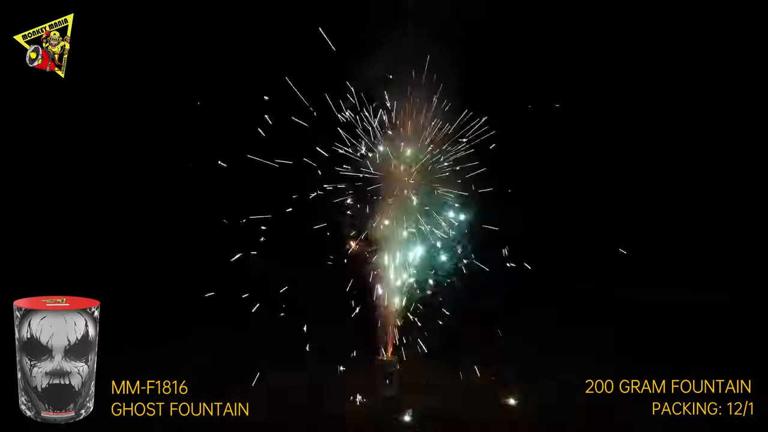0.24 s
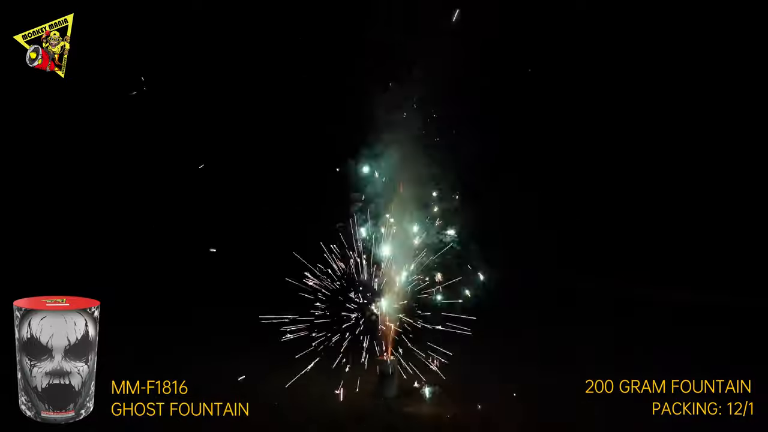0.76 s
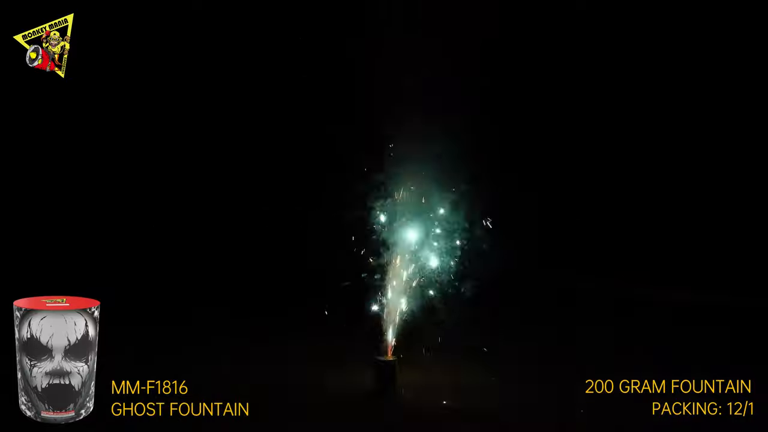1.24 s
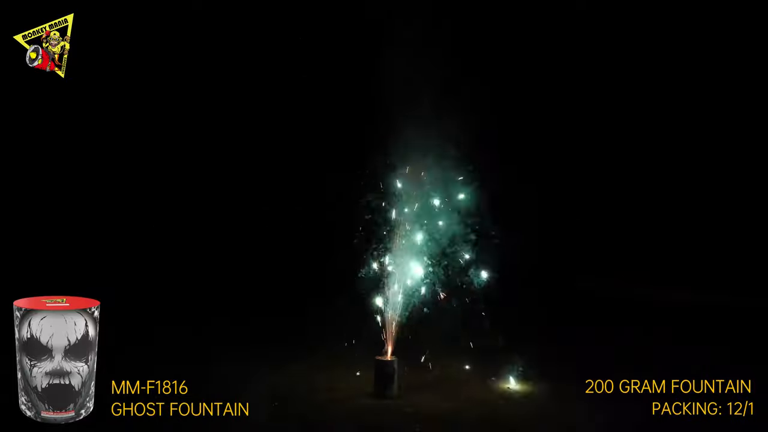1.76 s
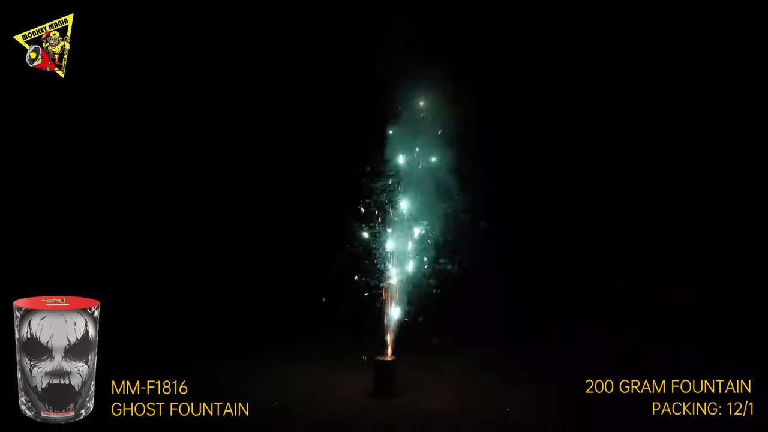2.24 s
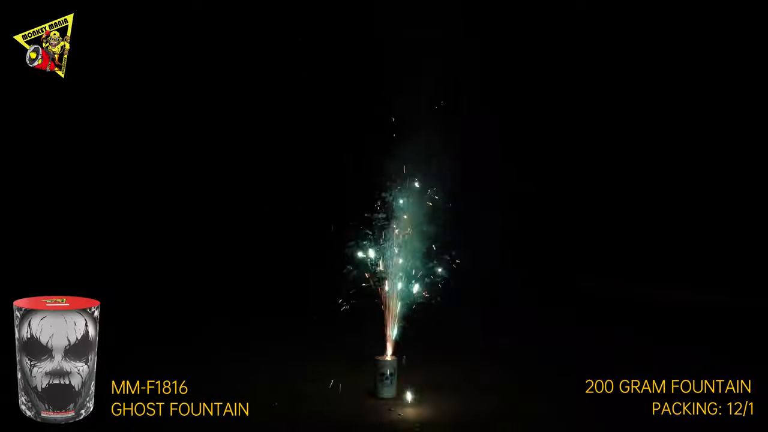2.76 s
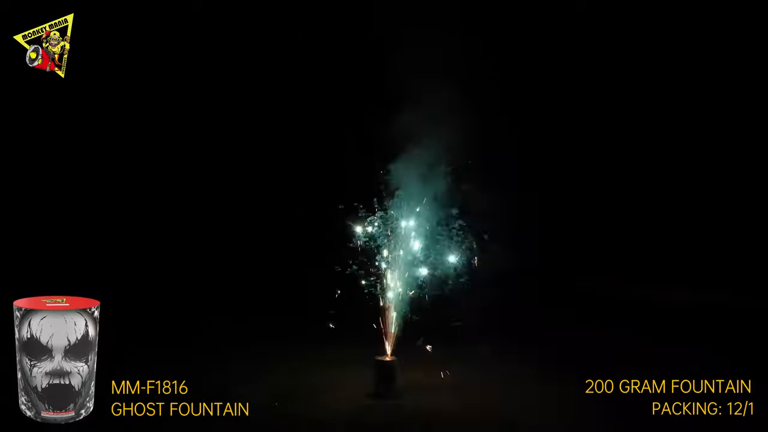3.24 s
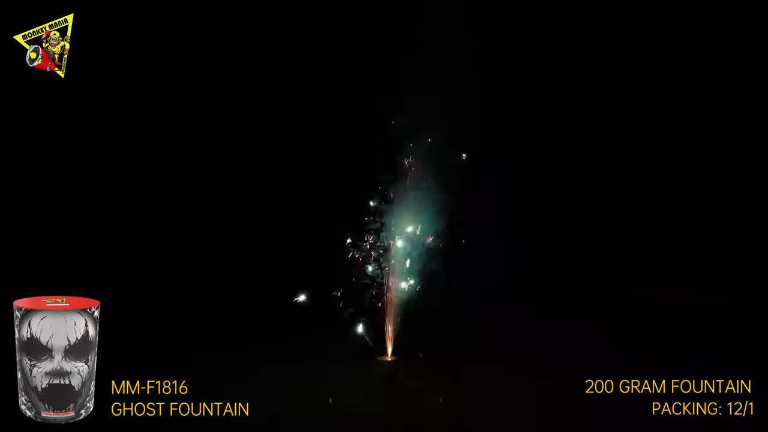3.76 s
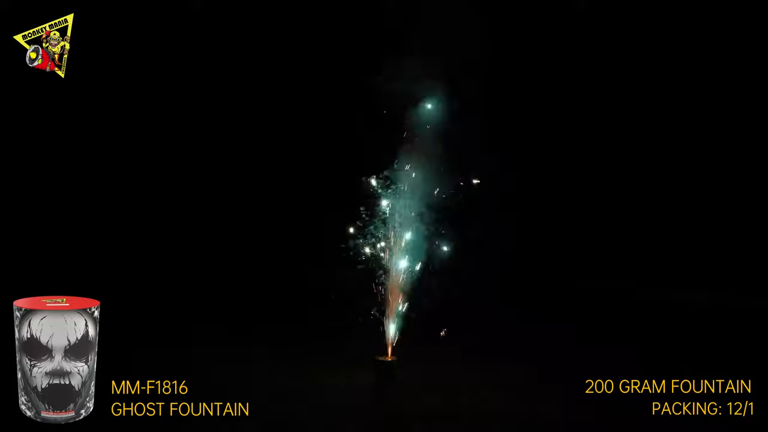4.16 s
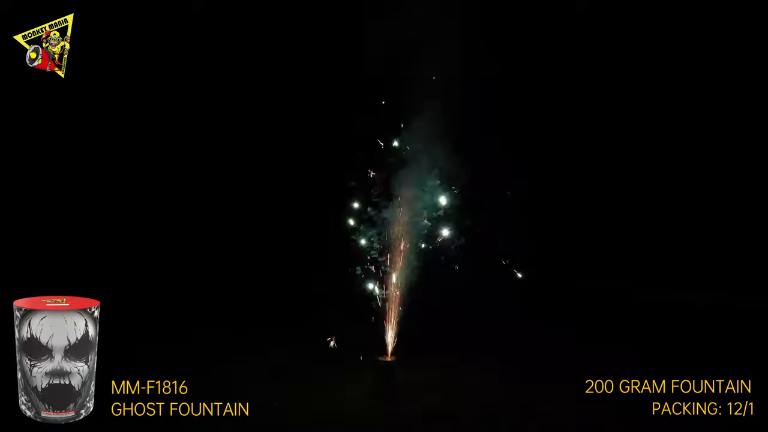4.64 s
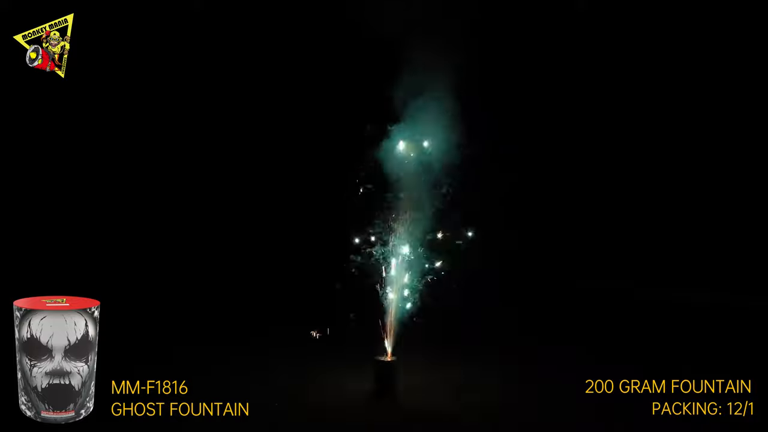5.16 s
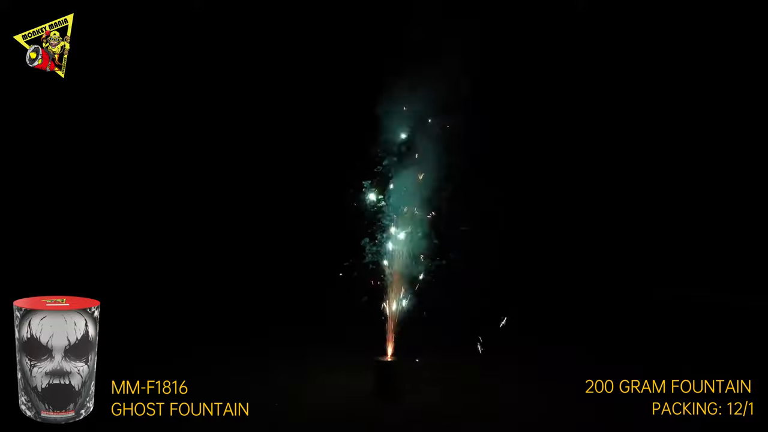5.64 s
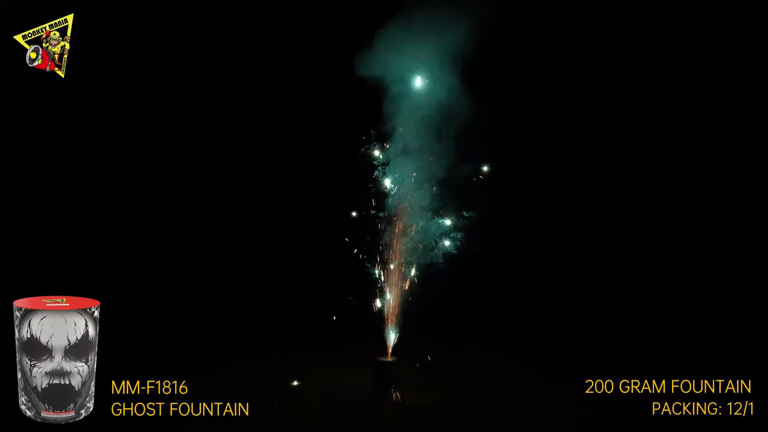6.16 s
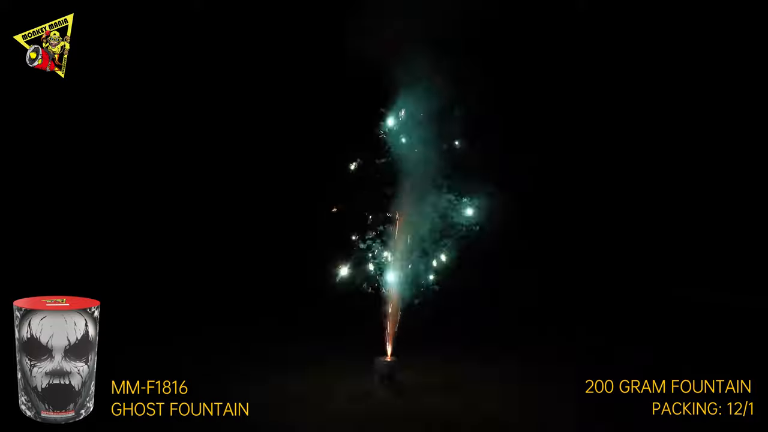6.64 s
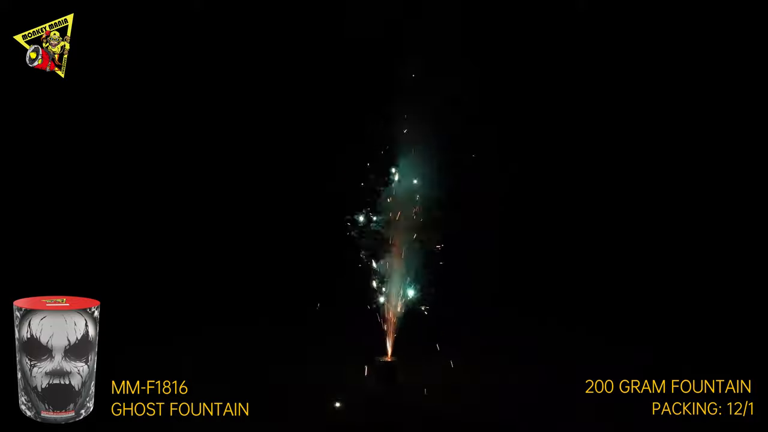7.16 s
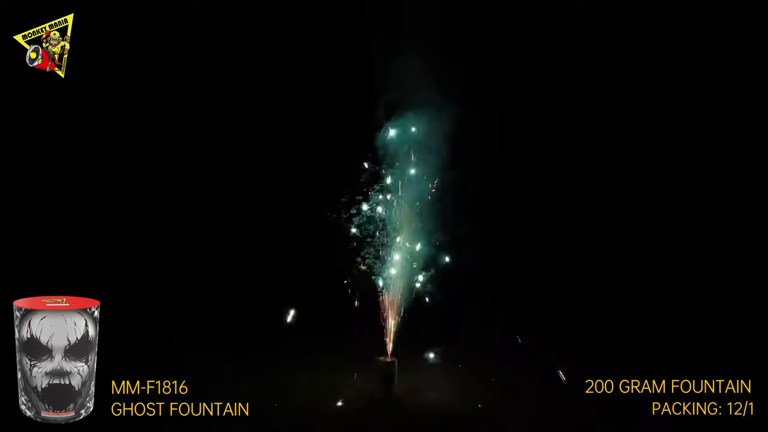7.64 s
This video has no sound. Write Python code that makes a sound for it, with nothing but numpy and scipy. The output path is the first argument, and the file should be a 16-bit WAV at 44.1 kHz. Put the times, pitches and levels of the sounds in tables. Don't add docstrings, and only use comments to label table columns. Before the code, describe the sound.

Close, bright outdoor capture of a burning fountain. Dense crackling snaps hit at full level first, almost without bass, with a faint short yard tail. They stop abruptly, leaving small tube pops and a very quiet jet. Over the next second or so the gusty rush rises smoothly, with two tiny ember ticks, then continues as a nearly constant, slightly fluttering hiss over a low roar.

```python
import sys
import numpy as np
from scipy import signal
from scipy.fft import rfft, irfft
from scipy.io import wavfile
from scipy.ndimage import uniform_filter1d

SR = 44100
rng = np.random.default_rng(int(sys.argv[2]) if len(sys.argv) > 2 else 0)


def invert_db(x):
    u = np.asarray(x, float) / 20
    return 10 ** u


def materialize(psi):
    bounded = np.clip(np.atleast_2d(psi).T, -1, 1)
    quanta = np.round(bounded * 32767).astype(np.int16)
    wavfile.write(sys.argv[1], SR, quanta)


N = 348390

# frequency in Hz, t60 in seconds.
YARD_DECAY = [(200, 0.21), (2000, 0.77), (6000, 0.62), (13000, 0.1)]
# start in seconds, frequency in Hz, peak in dB, t60 in seconds.
KNOCKS = [
    (.145, 160, -36, .015),
    (.248, 150, -29, .015),
    (2.1637, 3100, -9, .003),
    (2.1992, 5200, -1, .0022),
]
# start in seconds, peak in dB.
POPS = [
    (.3835, -32),
    (0.7097, -22),
    (0.758, -17.5),
    (0.9126, -19.5),
    (.9540, -14.5),
    (1.0085, -14),
    (1.304, -38),
    (1.588, -38),
]
# frequency in Hz, level in dB, t60 in seconds.
TUBE_MODES = [(2210, 4.5, 0.0087), (1660, -19, 0.0026), (3980, -4, 0.0062), (4400, -4, 0.0064),
              (5950, -2.5, 0.007), (8500, -1.5, 0.0029), (286, -21, 0.016), (690, -29, 0.033)]

# start in seconds, peak in dB, ground echo delay in ms.
HIGH_STARS = [(.0003, -8, 1.9), (.0039, -27, 2.1), (.0149, -1.9, 2.22), (.0291, -.2, 2.56),
              (.0446, -4.7, 2.74), (.0524, -.2, 2.77), (.0815, -.6, 2.63), (.0986, -.7, 1.18),
              (.1053, -7.1, 2.29), (.1129, -1.6, 2.11), (.1209, -4.3, 1.79), (.1321, -2, 2.29),
              (.1408, -1.6, 2.99), (.1443, -5.4, 2.22), (.1473, -12.9, 1.38), (.2056, -2.4, 2.52),
              (.2085, -1.4, 3.06), (.2104, -.3, 2.2), (.2478, -1.1, 2.68), (.2514, -1.8, 2.36),
              (.2668, -2.7, 2.56)]
# start in seconds, peak in dB, ground echo delay in ms.
LOW_STARS = [(.3146, -8.1, 1.59), (.3188, -.6, 2.61), (.4012, -.1, 2.18), (.4177, -.6, 1.36),
             (.4501, -.7, 1.61), (.462, -5.1, 1.09), (.4838, -1.8, 2.18), (.4863, -.4, 1.77),
             (.4964, -1, 1.63), (.5072, -8.6, 1.66), (.5168, -1.4, 1.27), (.5521, -1.1, 2.74),
             (.5853, -.1, 2.56), (.5894, -.5, 1.45), (.5932, -3.1, 1.81), (.5939, -1.8, 2.09),
             (.6288, 0, 1.81), (.6301, -9.7, 1.66), (.6459, -.9, .66), (.663, -.2, .91), (.7818, -.1, 1.07),
             (.7822, -10.3, 1.45), (.7858, -5.3, .95)]
# start in seconds, peak in dB.
FRAGMENTS = [(.001, -13.3), (.0014, -8.7), (.0089, -13.5), (.0107, -13.8), (.101, -10), (.1289, -2.5),
             (.1339, -14.2), (.1379, -8.7), (.1424, -15), (.1465, -13), (.189, -13), (.19, -16.5),
             (.2126, -6), (.2379, -12), (.2393, -12.8), (.2487, -14.3), (.4034, -8), (.4202, -12.5),
             (.4524, -.8), (.4555, -6.6), (.4659, -9.9), (.4671, -10.6), (.5089, -15), (.5102, -10.6),
             (.6329, -9.3), (.6651, -7.7)]
# delay in ms, gain as a factor.
BOUNCES = [(.38, -.16), (.88, .2), (1.14, .12), (5.6, .06)]
# frequency in Hz, gain as a factor, t60 in seconds, delay in ms.
PORT_MODES = [(9550, 1.12, .0015, .137), (10870, -.35, .0009, .072), (5000, -.33, .0017, .026)]
# frequency in Hz, level in dB.
STAR_COLOUR = [(150, -3), (300, 1), (600, 4), (850, -2), (1600, 1.5), (2700, 2), (6500, -2), (12000, 2)]

# frequency in Hz, level in dB per Hz.
RUMBLE = [(18, -74), (30, -44), (64, -37.5), (148, -6.5), (204, 0.5), (251, 1.5), (358, -1), (460, -10.5),
          (600, -61), (1010, -120)]
# frequency in Hz, level in dB per Hz.
BODY = [(300, -55), (480, -8.5), (1100, -10.5), (1350, -2.5), (2550, -4), (2900, -19.5), (3300, -11),
        (6500, -18), (7600, -25.5)]
# frequency in Hz, level in dB per Hz.
FIZZ = [(3880, -16), (6600, -6), (10000, 0), (12300, -7), (14800, -22), (15800, -74)]
# frequency in Hz,
# width in Hz, level in dB.
BUMPS = [(520, 44, -4.5), (627, 90, 1), (820, 23, -7.5), (1627, 133, 3), (2105, 184, 4.5), (3590, 390, 4),
         (4230, 150, -1.5), (4415, 180, 4), (5000, 430, 0.5), (5800, 350, 7.5), (7920, 200, 2.5),
         (8770, 210, 1.5), (9270, 150, 0), (11900, 360, 2), (13300, 300, 3.5), (15450, 120, -19)]
# time in seconds, level in dB.
BURN = [(2.3, -18), (2.56, -14), (2.91, -16), (3.38, -14), (3.41, -18.5), (3.83, -13.5), (4.42, -15.5),
        (4.62, -14), (4.65, -15.5), (5.28, -15), (5.37, -18.5), (5.85, -14), (6.18, -16.5), (6.32, -14.5),
        (6.53, -18), (6.57, -15.5), (7.82, -14), (7.9, -17)]
# centre in seconds, change in dB, length in seconds.
FLARES = [(1.59, 3.5, 0.0081), (2.196, 2, 0.008), (2.946, 2, 0.0064), (3.472, 1.5, 0.0041),
          (4.833, 2, .007), (4.923, 3, 0.004), (5.25, -1, 0.0086), (5.755, 2, 0.004), (5.867, 3, .006),
          (5.995, 4.5, 0.0086), (6.277, 2, 0.0051), (6.607, 4.5, 0.0027)]
# centre in seconds, rumble change in dB, length in seconds.
LUMPS = [(1.76, 0, 0.036), (2.071, 8, 0.021), (2.173, -4, 0.033), (3.068, 12, 0.011), (3.376, -4, 0.018),
         (3.577, -5, .025), (3.62, 3.5, .025), (4.346, -10, .025), (4.678, 7, .025), (4.71, -4, 0.017),
         (5.39, 8, 0.013), (6.354, 2, 0.026), (6.4, -1, 0.018), (7.12, 5.5, .02), (7.172, 2.5, .02),
         (7.353, 3, .04), (7.52, -6, 0.01)]
# centre in seconds, change in dB, length in seconds.
SURGES = [(.71, -1, .06), (1.773, 2, 0.077), (2.57, 1, 0.039), (2.83, 1, .015), (3.367, -0.5, .03),
          (3.4, -1.5, 0.035), (4.18, -2, .04), (4.29, 0.5, .02), (4.326, -2.5, .03), (4.61, 0.5, 0.033),
          (4.664, 0, 0.017), (5.102, 0.5, .03), (5.263, 2.5, 0.041), (5.384, 1, 0.014), (6.39, 2, .04),
          (6.438, -0.5, 0.026), (6.9, 1.5, 0.018), (6.944, -1.5, 0.056), (7.183, -2, 0.025),
          (7.717, -2.5, 0.099)]
# centre in seconds, change in dB, length in seconds.
SPARK_RICH = [
    (.05, -5, .2),
    (2.0, 0.5, 0.26),
    (4.3, 2, 0.65),
]

# frequency in Hz, left minus right in dB.
LEAN = [(300, 0), (450, -1.5), (800, -1.7), (1300, -1), (2100, -.4), (3300, 0), (5500, .3), (9000, 0)]
# frequency in Hz, side level in dB.
APART = [(100, -69), (400, -21.5), (1200, -25), (3000, -28), (4400, -22), (5500, -32), (6500, -14.5),
         (8000, -31), (12000, -38), (15000, -10)]

GRAZING_DB, HIGH_DB_PER_MS, LOW_DB_PER_MS = -1, -2.8, -2.1
FRAGMENT_ECHO_MS, FRAGMENT_ECHO_DB = 2.5, -18
STAR_SPREAD_DB = 1.5
HELD_DB, LIFT_S, LIFTED_DB, RELEASE_S, RELEASE_DB_PER_S = -41, .62, -36.5, 0.99, 28.5
USUAL_DB, BODY_DB = -15, -13
RUMBLE_DB, RUMBLE_FOLLOWS, FIZZ_DB, FIZZ_FOLLOWS = -24.5, 0.8, -19, 0.78


def evened(x):
    return x / np.sqrt(np.mean(x ** 2) + 1e-20)


def read(points, hz):
    f, value = np.transpose(points)
    return np.interp(np.log(hz + 1), np.log(f + 1), value)


def highpass(x, order, hz):
    return signal.sosfilt(signal.butter(order, hz, "high", fs=SR, output="sos"), x)


def drift(t, low_hz, top_hz):
    total = 0
    for f in np.geomspace(low_hz, top_hz, num=60):
        total = total + np.sin(2 * np.pi * (f * t + rng.random())) / f ** 0.076
    return evened(total)


def humps(t, rows):
    return sum(db * np.exp(-((t - at) / length) ** 2) for at, db, length in rows)


def place(start_s):
    first = max(round(start_s * SR) - 8, 0)
    return slice(first, first + 1500), np.arange(first, first + 1500) / SR - start_s


def ring(t, hz, t60, rise):
    u = np.maximum(t, 0)
    return np.sin(2 * np.pi * hz * u) * invert_db(-60 * u / t60) * (1 - np.exp(-u / rise))


def shock(t, rise, length, suction):
    u = np.maximum(t - rise, 0) / length
    return np.exp(-(t / rise) ** 2) - suction * u * np.exp(1 - u)


def yard(x):
    length = SR // 2
    taps = np.zeros((2, length))
    starts = np.arange(300, length - 20, 10)
    at = starts + rng.integers(0, 10, (2, len(starts)))
    np.put_along_axis(taps, at, rng.choice([-1., 1.], at.shape), axis=1)
    taps[1] = .98 * taps[0] + .2 * taps[1]
    taps *= invert_db(4.0 * drift(np.arange(length) / SR, 15, 200))
    hz, t, z = signal.stft(taps, SR, nperseg=128)
    decay = invert_db(-60 * t / read(YARD_DECAY, hz)[:, None])
    tail = signal.istft(z * decay, SR, nperseg=128)[1]
    return signal.fftconvolve(x[None], tail / np.linalg.norm(tail[0]), axes=1)[:, :N]


def knocks():
    out = np.zeros(N)
    for s, hz, db, t60 in KNOCKS:
        span, t = place(s)
        out[span] += invert_db(db) * ring(t, hz, t60, .5 / hz)
    return out


def pops():
    out = np.zeros(N)
    for s, db in POPS:
        span, t = place(s)
        click = highpass(shock(t, .00005, .0001, 0.42), 2, 1400)
        tube = sum(invert_db(d) * ring(t, f, t60, .0001) for f, d, t60 in TUBE_MODES)
        wave = click + invert_db(-2.0) * tube
        out[span] += invert_db(db) * (wave + invert_db(-18) * np.roll(wave, 255))
    out = signal.lfilter(*signal.iirnotch(3050, 4.5, SR), out)
    return highpass(out, 4, 190)


def stars():
    rows = []
    for table, slope in ((HIGH_STARS, HIGH_DB_PER_MS), (LOW_STARS, LOW_DB_PER_MS)):
        rows += [(s, db, ms, GRAZING_DB + slope * ms) for s, db, ms in table]
    return rows + [(s, db, FRAGMENT_ECHO_MS, FRAGMENT_ECHO_DB) for s, db in FRAGMENTS]


def arrival(t, angle, ringing):
    def blast(u):
        return shock(u, .000027, .0001, .11)

    wave = blast(t)
    for ms, gain in BOUNCES:
        wave = wave + gain * blast(t - ms / 1000 * (1 + .07 * angle))
    port = 0
    for hz, gain, t60, ms in PORT_MODES:
        port = port + gain * ring(t - ms / 1000, hz * (1 + .05 * angle), t60, .0001)
    return wave + ringing * port


def crackle():
    out = np.zeros((2, N))
    sides = np.array([[1], [-1]])
    for s, db, echo_ms, echo_db in stars():
        span, t = place(s)
        angle, echo_angle = rng.uniform(-1, 1, size=2)
        near = arrival(t, angle, .85)
        near += invert_db(echo_db) * arrival(t - echo_ms / 1000, echo_angle, .55)
        scatter = rng.standard_normal(700) * invert_db(-60 * np.arange(700) / SR / .014)
        near += invert_db(-12) * np.convolve(near, scatter / np.linalg.norm(scatter))[:len(t)]
        out[:, span] += invert_db(db + 2.3 + STAR_SPREAD_DB * angle * sides) * near
    out = irfft(rfft(out) * invert_db(read(STAR_COLOUR, np.fft.rfftfreq(N, 1 / SR))), N)
    return highpass(out, 2, 220)


def recovery(t):
    held = HELD_DB + (LIFTED_DB - HELD_DB) * np.clip((t - LIFT_S) / .08, 0, 1)
    return np.minimum(held + RELEASE_DB_PER_S * np.maximum(t - RELEASE_S, 0), 0)


def jet():
    t, hz = np.arange(N) / SR, np.fft.rfftfreq(N, 1 / SR)
    burn_db = np.interp(t, *np.transpose(BURN)) - USUAL_DB + humps(t, SURGES)
    level_db = recovery(t) + humps(t, FLARES)
    rumble_db = RUMBLE_DB + RUMBLE_FOLLOWS * burn_db + humps(t, LUMPS)
    fizz_db = FIZZ_DB + FIZZ_FOLLOWS * burn_db + humps(t, SPARK_RICH)
    sputter, puffs = drift(t, 6, 160), drift(t, 12, 80)
    bumps_db = sum(db * np.exp(-((hz - f) / width) ** 2) for f, width, db in BUMPS)
    layers = ((RUMBLE, rumble_db + 0.86 * sputter + 1.0 * puffs),
              (BODY, BODY_DB + burn_db + 0.89 * sputter),
              (FIZZ, fizz_db + 0.82 * sputter))
    out = 0
    for shape, db in layers:
        colour = invert_db(read(shape, hz) + bumps_db)
        noise = evened(irfft(rfft(rng.standard_normal(N)) * colour, N))
        out = out + invert_db(level_db + db) * noise
    patches = rng.standard_normal((N // 64 + 5, 129))
    patches = evened(uniform_filter1d(uniform_filter1d(patches, 30, 0), 6, 1))
    z = signal.stft(out, nperseg=256, noverlap=192)[2]
    z = z * invert_db(0.56 * patches[:z.shape[1]].T)
    return signal.istft(z, nperseg=256, noverlap=192)[1][:N]


def scene():
    bursts = crackle() + pops() + knocks()
    return bursts + jet() + invert_db(-23.5) * yard(bursts.mean(axis=0))


def top_cut(x):
    return signal.sosfilt(signal.butter(12, 16670, fs=SR, output="sos"), x)


def record(dry):
    hz = np.fft.rfftfreq(N, 1 / SR)
    wander = dry.mean(0) * drift(np.arange(N) / SR, 8, 150)
    side = rfft(wander) * invert_db(read(APART, hz))
    sign = np.array([[1], [-1]])
    x = irfft(rfft(dry) * invert_db(sign * read(LEAN, hz) / 2) + sign * side, N)
    x = highpass(x, 4, 90)
    x = 1.7 * np.tanh(x / 1.7)
    band_limit = signal.firwin(2047, 15740, window=("kaiser", 9), fs=SR)
    x = signal.oaconvolve(x, band_limit[None], "same")
    return top_cut(np.clip(x, -1, 1))


dry = scene()
out = record(dry)
materialize(out)
```